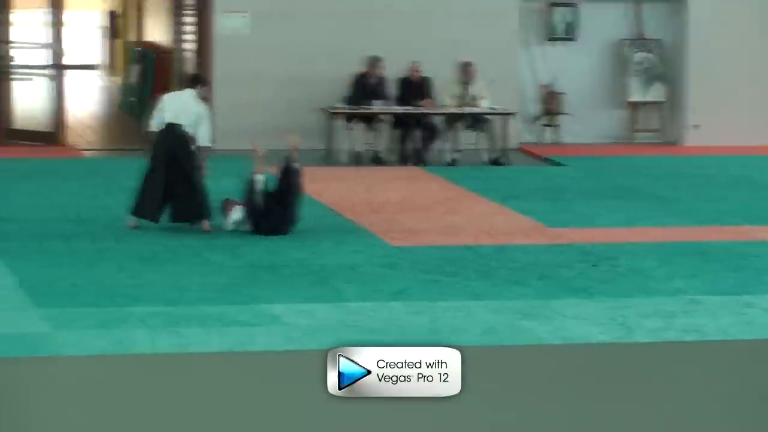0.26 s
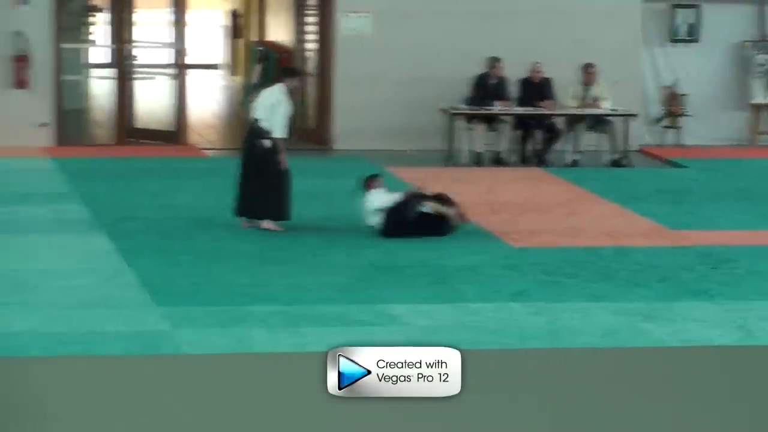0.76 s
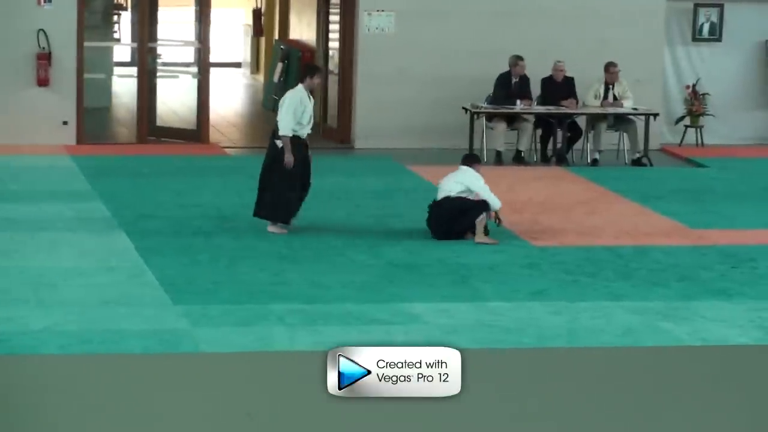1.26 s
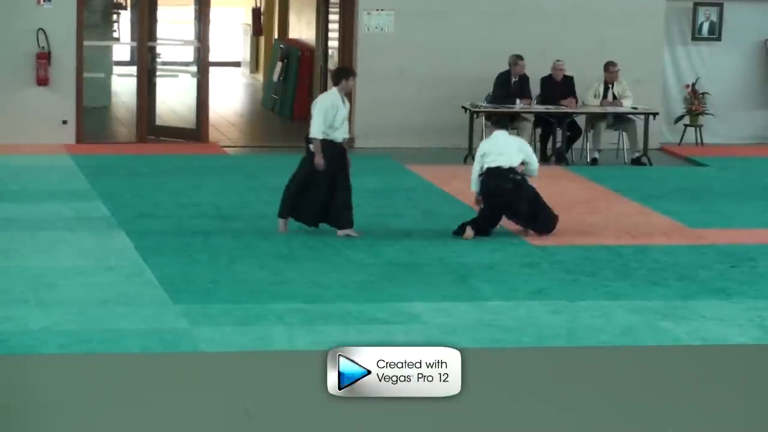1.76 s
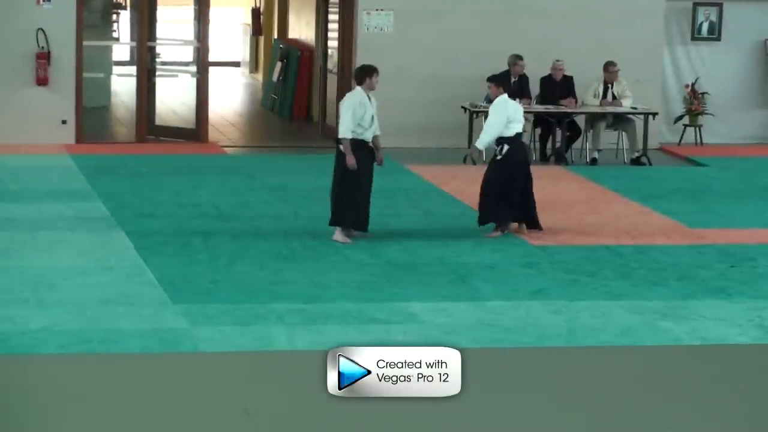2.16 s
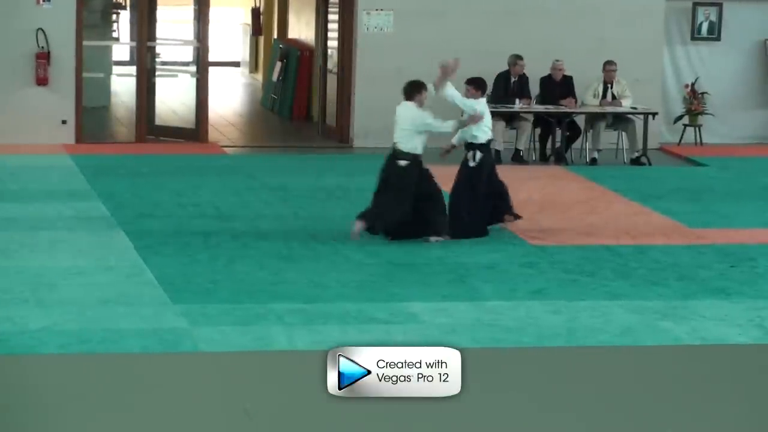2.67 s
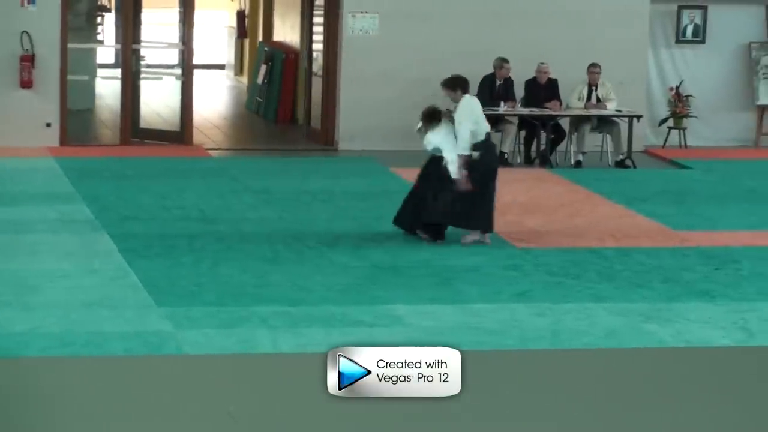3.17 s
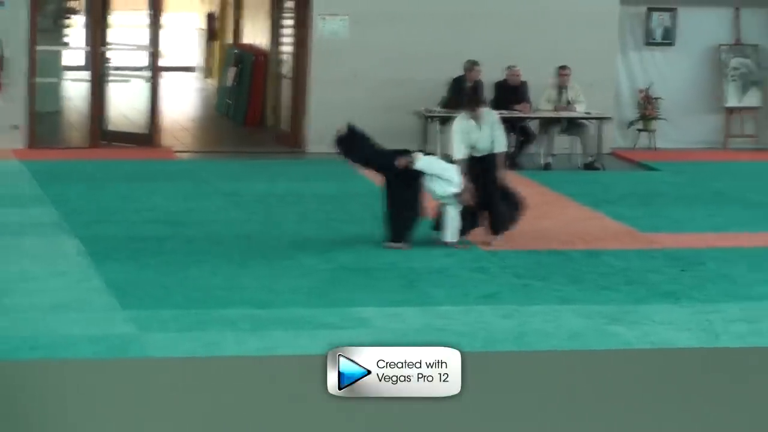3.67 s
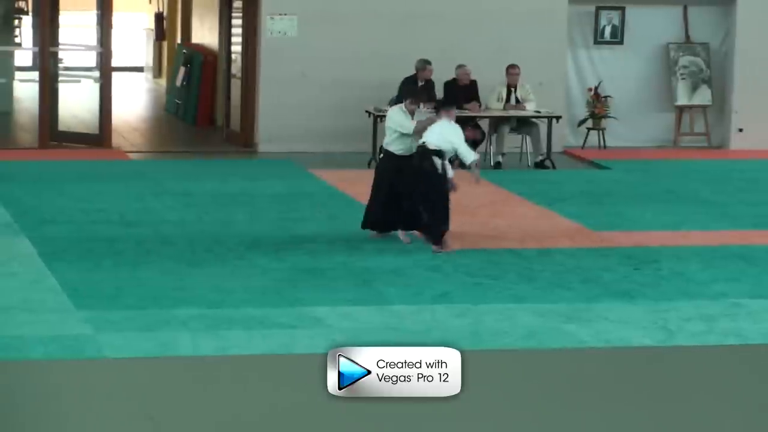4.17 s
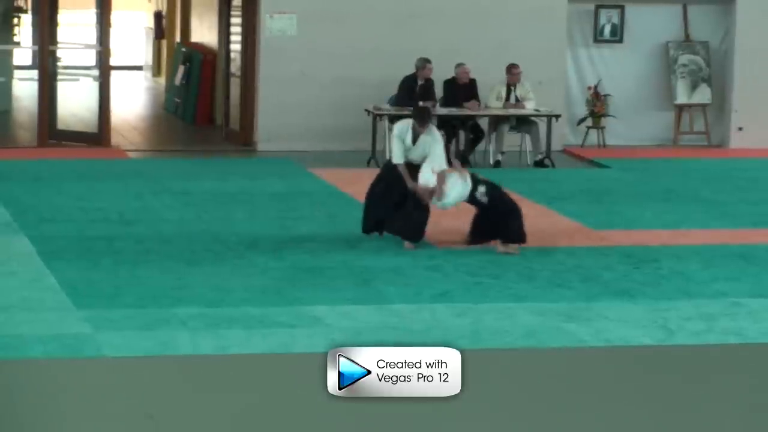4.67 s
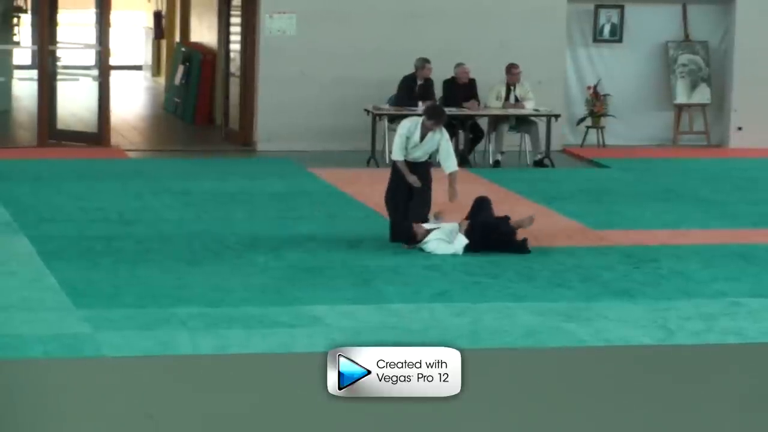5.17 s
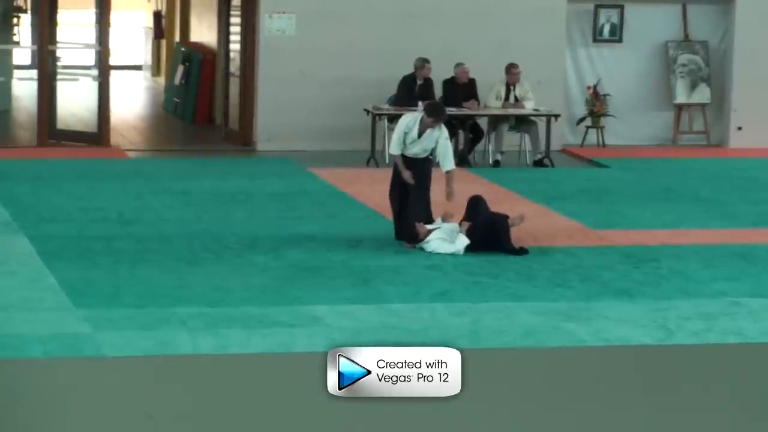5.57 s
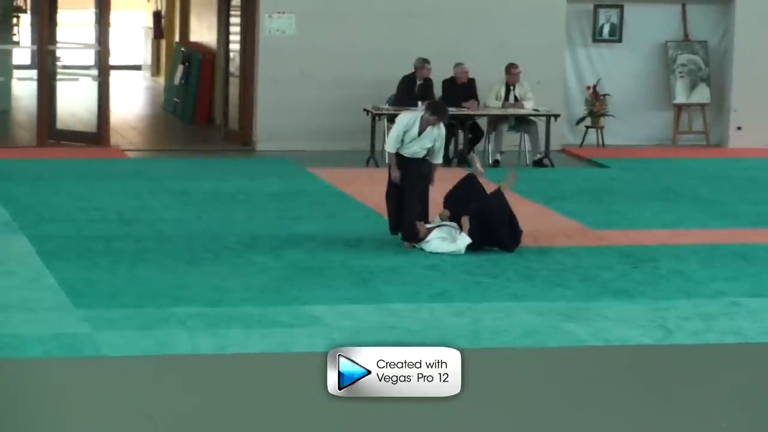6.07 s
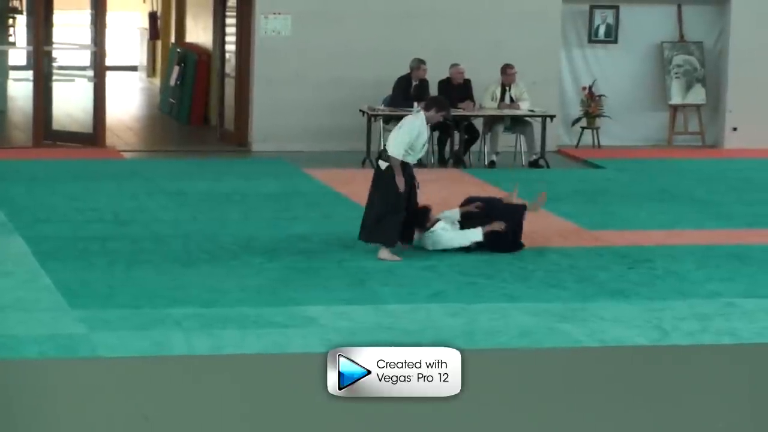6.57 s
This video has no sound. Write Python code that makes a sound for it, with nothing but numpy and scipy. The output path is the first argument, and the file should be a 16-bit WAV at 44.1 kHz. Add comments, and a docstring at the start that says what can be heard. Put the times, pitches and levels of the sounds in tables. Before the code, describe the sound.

Two people practise throws on padded mats in a large echoing hall. Dull thuds and two faint clicks come first, then a quick volley of slaps with a low boom as a body hits the mat. Bare feet thud, slide and squeak faintly before a second, louder landing. A few soft swishes follow. The microphone hears it from some distance, over a low rumble of air.

```python
"""Practising throws in a sports hall

Two people train on padded mats. Twice a body lands flat: arm, back and legs slap the cover,
thump the pads and make the floor boom. Two light taps come early on; around the falls, bare
feet step, slide and squeak. The large hall rings on over a low rumble of air."""
import sys
import numpy as np
from scipy import signal
from scipy.fft import rfft, irfft, next_fast_len
from scipy.io import wavfile

SR = 44100
rng = np.random.default_rng(int(sys.argv[2]) if len(sys.argv) > 2 else 0)


def generate_wav(sig):
    """Save sig (samples, or channels by samples) to the path in sys.argv[1] as 16-bit PCM at SR."""
    pcm = np.round(np.clip(np.atleast_2d(sig).T, -1, 1) * 32767).astype(np.int16)
    wavfile.write(sys.argv[1], SR, pcm)


N = 301203


def amp(db):
    """Turn decibels into a number to multiply a sound by."""
    return 10 ** (np.asarray(db) / 20)


def unit(x):
    """Scale a sound to an average (rms) level of 1."""
    return x / np.sqrt(np.mean(x ** 2) + 1e-20)


def unit_hit(x):
    """Give a short sound the same energy as 10 ms at level 1."""
    return x * np.sqrt(SR / 100 / (np.sum(x ** 2) + 1e-20))


def fade(t, t60):
    """A fade that drops by 60 dB in t60 seconds, the fade time."""
    return np.exp(-np.log(1000) * t / t60)


def along(points, hz):
    """Read between the rows of a (Hz, value) table, giving each octave equal room."""
    freqs, values = np.transpose(points)
    return np.interp(np.log(hz + 1), np.log(freqs), values)


def filtered(x, response):
    """Multiply each frequency in a sound by response(hz)."""
    n = x.shape[-1]
    size = next_fast_len(n + 8192)
    return irfft(rfft(x, size) * response(np.fft.rfftfreq(size, 1 / SR)), size)[..., :n]


def coloured(x, spectrum, size=4096):
    """Shape the tone with a (Hz, dB) table, letting nothing sound ahead of the hit."""
    cepstrum = irfft(np.log(amp(along(spectrum, np.fft.rfftfreq(size, 1 / SR)))))
    cepstrum[1:size // 2] *= 2
    cepstrum[size // 2 + 1:] = 0
    return signal.fftconvolve(x, irfft(np.exp(rfft(cepstrum))))[:len(x)]


def add(track, start_s, sound):
    """Mix a sound into the track at the given time."""
    start = max(0, round(start_s * SR))
    part = track[:, start:start + sound.shape[-1]]
    part += sound[..., :part.shape[-1]]


def air():
    """The air in the room makes a steady noise, with more rumble on the right."""
    # The tone of the air on each side. Each row: frequency in Hz, relative level in dB.
    left_tone = [(8, 1), (22, 1), (100, -3), (900, -0.5), (2000, -6), (4000, -12), (8000, -17.5),
                 (11000, -20.5), (12500, -43), (15500, -34)]
    right_tone = [(8, -26), (24, 1.5), (65, 0.5), (130, -6.5), (220, -10.5), (450, -18), (1000, -21),
                  (2000, -25), (3200, -30), (7500, -33), (11000, -40.5), (14500, -40.5), (15500, -57)]
    left, right = rng.standard_normal((2, N))
    left = amp(-51.5) * unit(filtered(left, lambda hz: amp(along(left_tone, hz))))
    right = amp(-43.5) * unit(filtered(right, lambda hz: amp(along(right_tone, hz))))
    return np.array([left, right])


def hall(x, echo_db, gap_s=0.00067, build_s=0.002):
    """The direct sound comes first; a wash of echoes builds up, then dies fastest in the treble."""
    # How long the hall rings. Each row: frequency in Hz, fade time in seconds.
    fade_times = [(60, 1.12), (120, 1.75), (300, 1.2), (700, 1.5), (2000, 1.67), (4000, 1.51), (7500, 0.86),
                  (11000, 0.49), (15000, 0.41)]
    # Echo strength. Each row: frequency in Hz, dB above the direct sound before echo_db is added.
    echo_levels = [(60, 1.5), (130, -1.5), (300, -3), (1000, 1.5), (4000, 1), (12000, 5.5)]
    # How alike the left and right echoes are. Each row: frequency in Hz, likeness from 0 to 1.
    likeness = [(60, 0.31), (300, 0.85), (1000, 0.81), (3000, 0.63), (8000, 0.53), (15000, .2)]
    hz, t, noise = signal.stft(rng.standard_normal((2, 2 * SR)), SR, nperseg=512)
    t60 = along(fade_times, hz)[:, None]
    even_energy = np.sqrt(2 * np.log(1000) / (t60 * SR))  # a longer ring gains no energy
    tail = noise * amp(along(echo_levels, hz)[:, None] + echo_db) * even_energy * fade(t, t60)
    spread = np.arccos(np.clip(along(likeness, hz), 0, 1))[:, None] / 2
    mid, side = signal.istft(tail * [np.cos(spread), np.sin(spread)], SR, nperseg=512)[1]
    since_gap = np.maximum(np.arange(len(mid)) / SR - gap_s, 0)
    response = np.array([mid + side, mid - side]) * (1 - np.exp(-since_gap / build_s))
    response[:, 0] += 1  # the direct sound
    return signal.fftconvolve(x[None], response, axes=1)


def standing_waves(x):
    """A boom stirs two close, low notes of the hall, which throb against each other as they fade."""
    # The hall's own notes. Each row: pitch in Hz, fade time in seconds, strength in dB.
    notes = [(76.5, 1.5, -10), (87, 1.5, -9)]
    t = np.arange(2 * SR) / SR
    response = sum(amp(db) * 4 * np.log(1000) / (t60 * SR) * fade(t, t60) * np.cos(2 * np.pi * hz * t)
                   for hz, t60, db in notes)
    return signal.fftconvolve(x, response)[:N]


def crack(t, t60, spectrum):
    """Air squeezed from between two surfaces makes a burst of noise that dies at once."""
    decay = fade(t, t60)
    phases = np.angle(rfft(rng.standard_normal(len(t)) * decay))
    even_noise = irfft(np.exp(1j * phases), len(t))  # equally strong at every frequency
    return unit_hit(coloured(even_noise * decay ** (1 / 4), spectrum))


def ring(t, notes, scatter=0.019, vary_db=6.5):
    """A struck thing rings with its own notes, different at every spot; wider notes die sooner."""
    out = np.zeros(len(t))
    for k, (hz, width_hz, db) in enumerate(notes):
        pitch_luck, level_luck = rng.standard_normal(2)
        strength = (-1) ** k * amp(db + vary_db * level_luck) * width_hz
        tone = np.sin(2 * np.pi * hz * np.exp(scatter * pitch_luck) * t)
        out += strength * np.exp(-np.pi * width_hz * t) * tone
    return unit_hit(out)


def taps():
    """Small, hard clicks with a short hollow ring come from across the hall."""
    # The taps. Each row: start in seconds, level in dB.
    hits = [(0.6009, -45.5), (0.653, -53.5)]
    # The tone of a click. Each row: frequency in Hz, relative level in dB.
    click_tone = [(300, -25), (800, -3), (1050, -2), (1250, 4), (1550, -6), (2200, -3), (4000, -9),
                  (5200, -26), (15000, -50)]
    out, t = np.zeros((2, N)), np.arange(SR // 10) / SR
    for start_s, db in hits:
        click = crack(t, t60=0.033, spectrum=click_tone)
        hollow = amp(-11) * ring(t, [(1250, 42, 0)])  # one note near 1250 Hz, 42 Hz wide
        add(out, start_s, hall(amp(db) * (click + hollow), echo_db=0.5))
    return out


def squeaks(width_hz=194, sag_octaves_per_s=0.8):
    """A sole sticks and slips on the vinyl: a rough whistle that sags as the foot slows."""
    # The squeaks. Each row: loudest moment in seconds, level in dB, half length in seconds, pitch in Hz.
    slips = [(2.574, -55.5, 0.056, 3317), (3.417, -58, .028, 5060)]
    out, t = np.zeros((1, N)), np.arange(SR) / SR - .5
    for peak_s, db, half_s, hz in slips:
        flutter = filtered(rng.standard_normal(SR), lambda f: 1 / (1 + (f / width_hz) ** 2))
        whistle = np.sin(2 * np.pi * np.cumsum(hz * 2 ** (-sag_octaves_per_s * t)) / SR)
        swell = np.exp(-(t / half_s) ** 2 / 2)
        add(out, peak_s - .5, amp(db) * unit(flutter * whistle) * swell)
    return hall(out[0], echo_db=-3.0)[:, :N]


def slides(width_octaves=0.88, grain_db=3, grain_hz=140, dull_hz=11500):
    """Soles and cloth rub the cover: a hiss that swells and fades, grainy from the weave."""
    # The sweeps. Each row: loudest moment in seconds, level in dB, half length in seconds.
    sweeps = [(0.718, -62, 0.077), (0.992, -68, 0.1), (1.417, -62, 0.046), (1.593, -65, 0.08),
              (2.603, -56.5, 0.071), (3.041, -65.5, 0.043), (3.397, -57, 0.033), (3.505, -55, .081),
              (3.649, -60, 0.091), (4.114, -57, 0.016), (4.388, -58, 0.1), (6.379, -60.5, .075),
              (6.486, -54, 0.036), (6.636, -66, 0.09)]
    out, t = np.zeros((1, N)), np.arange(SR) / SR
    for peak_s, db, half_s in sweeps:
        centre_hz = 6700 * (0.042 / half_s) ** 0.28  # a quicker sweep is brighter
        band = lambda f: 1 / (1 + (np.log2((f + 1) / centre_hz) / width_octaves) ** 2 / 2) ** 2
        hiss = filtered(rng.standard_normal(SR), lambda f: band(f) / np.sqrt(1 + (f / dull_hz) ** 10))
        grain = amp(grain_db * np.interp(t * grain_hz, np.arange(SR), rng.standard_normal(SR)))
        swell = np.exp(-((t - .5) / half_s) ** 2 / 2)
        add(out, peak_s - .5, amp(db) * unit(hiss * grain) * swell)
    return hall(out[0], echo_db=-4.5)[:, :N]


def mat_hit(slap_db, pad_db, floor_db, pitch, slap_t60, softness, tilt_db_per_octave,
            pocket_hz, pocket_db, pocket_octaves):
    """Skin slaps the cover over a pocket of trapped air, the pad thumps and the floor gives way."""
    # The tone of skin on the cover. Each row: frequency in Hz, relative level in dB.
    skin_tone = [(150, -24), (500, -2), (720, 1.5), (900, 0.5), (1130, 4.5), (1450, 1.5), (2000, 2.5),
                 (2600, -2), (3300, 1.5), (5000, -1), (7200, -3.5), (11000, -15), (15500, -38)]
    # The notes of the pads and the floor. Each row: pitch in Hz, width in Hz, relative level in dB.
    pad_notes = [(160.5, 23, -10.5), (290.4, 49, -0.5), (388, 77, 2), (558, 630, -14)]
    floor_notes = [(55, 21, -15), (70.4, 34, -4.5), (99.8, 11.7, -1.5), (151, 64, -6.5)]
    t = np.arange(SR // 4) / SR
    press = 1 - np.exp(-t / (softness * slap_t60))  # a broad, slow contact starts gently
    hz = np.geomspace(100, SR / 2, 200)
    pocket = pocket_db * np.exp(-(np.log2(hz / pocket_hz) / pocket_octaves) ** 2 / 2)
    tone_db = along(skin_tone, hz) + tilt_db_per_octave * np.log2(hz / 2500) + pocket
    slap = unit_hit(press * crack(t, slap_t60, np.transpose([hz, tone_db])))
    pad = unit_hit(press * ring(t * pitch, pad_notes, scatter=0.036))
    floor = unit_hit(press * ring(t, floor_notes))
    return amp(slap_db) * slap - amp(pad_db) * pad - amp(floor_db) * floor


def steps():
    """Feet and a rolling body come down softly: dull thuds, heard mostly through the hall's echo."""
    # The thuds. Each row: start in seconds, pad thump in dB, floor boom in dB, pad pitch as a ratio.
    thuds = [(.001, -36.5, -26.5, 1.06), (0.057, -43.5, -33.5, 0.93), (0.143, -49, -35.5, 0.76),
             (0.3077, -44, -53.5, 1.08), (.564, -50, -48, 0.66), (1.395, -51, -46, 1.18),
             (1.63, -55, -58, 1.55), (2.164, -28.5, -17, 0.62), (2.245, -26, -37, 1.01),
             (2.385, -44, -26, 1.13), (3.11, -51.5, -52.5, 1.006), (4.121, -39, -38, .85),
             (4.15, -35.5, -41, 0.43), (4.465, -49.5, -39, 0.84), (4.692, -58, -63, 0.77),
             (5.125, -31, -16, 0.95), (5.29, -36.5, -24.5, 1.01)]
    out = np.zeros((2, N))
    for start_s, pad_db, floor_db, pitch in thuds:
        # Harder contacts scuff more, and so do small, high-pitched ones.
        scuff_db = -46.5 + 0.51 * (pad_db + 41) + 1.5 * np.log2(pitch)
        thud = mat_hit(scuff_db, pad_db, floor_db, pitch,
                       slap_t60=0.1, softness=0.023, tilt_db_per_octave=-4.0,
                       pocket_hz=636, pocket_db=4, pocket_octaves=0.35)
        add(out, start_s, hall(thud, echo_db=3.5))
    return out


def falls(boom_above_slap_db=5.5, sink_delay_s=0.012):
    """Limbs land in a quick volley: the skin slaps first, then the weight sinks into the mat."""
    # Limbs landing flat. Each row: start in seconds, slap in dB, pad thump in dB, weight behind it
    # in dB, slap fade time in seconds, pad pitch as a ratio, pitch of the trapped air in Hz.
    limbs = [(2.0208, -24.5, -19.5, -17.5, 0.013, 1.03, 2200), (2.0592, -28, -19, -17, 0.017, 1.23, 4400),
             (2.091, -30, -20.5, -16, 0.028, 1.11, 4300), (2.1158, -36.5, -31, -24, 0.024, 1.37, 2100),
             (2.271, -41.5, -23.5, -29, 0.045, 1.06, 3560), (4.9424, -20, -9, -13.5, 0.023, 0.995, 2210),
             (4.9701, -26.5, -15.5, -21.5, 0.028, 0.92, 3350),
             (4.9905, -27.5, -18.5, -13, 0.043, 1.033, 3470), (5.0718, -30.5, -18, -36, 0.023, 0.97, 3100),
             (5.0949, -38.5, -22.5, -24.5, 0.012, 1.16, 2200)]
    out = np.zeros((2, N))
    for start_s, slap_db, pad_db, weight_db, t60, pitch, pocket_hz in limbs:
        slap = mat_hit(slap_db, pad_db, slap_db + boom_above_slap_db, pitch,
                       slap_t60=t60, softness=0.037, tilt_db_per_octave=-1.1,
                       pocket_hz=pocket_hz, pocket_db=5, pocket_octaves=0.28)
        sink = mat_hit(slap_db - 10.5, weight_db - 0.5, weight_db, pitch,
                       slap_t60=0.047, softness=0.035, tilt_db_per_octave=-0.4,
                       pocket_hz=3000, pocket_db=4, pocket_octaves=0.32)
        add(out, start_s, hall(slap, echo_db=-3.04))
        add(out, start_s + sink_delay_s, hall(sink, echo_db=-2.0))
    return out + standing_waves(out.mean(axis=0))


def microphones(hz):
    """Two close microphones hear the mat a little louder on the right and earlier on the left."""
    # The balance. Each row: frequency in Hz, left level minus right level in dB.
    balance = [(60, -2.5), (200, -1), (700, -3), (1300, -4.5), (4400, -6.8), (15000, -6)]
    # The left side's head start. Each row: frequency in Hz, lead in radians.
    lead = [(60, 1), (160, 0.08), (450, 0.91), (900, 0.21), (1700, .4), (3700, 0.72), (15000, 0)]
    share = np.array([[.5], [-.5]])
    return amp(share * along(balance, hz)) * np.exp(1j * share * along(lead, hz))


def scene(low_cut_hz=48):
    """Cut the deepest bass from all the practice sounds and lay them over the room noise."""
    action = falls() + steps() + taps() + slides() + squeaks()
    action = signal.sosfilt(signal.butter(3, low_cut_hz, "high", fs=SR, output="sos"), action)
    return filtered(action, microphones) + air()


def record(dry, ceiling=0.79, top_hz=15720):
    """Round off the loudest peaks and cut away the very highest treble."""
    rounded = dry / (1 + np.abs(dry / ceiling) ** 6) ** (1 / 6)
    return filtered(rounded, lambda hz: hz < top_hz)


dry = scene()
out = record(dry)
generate_wav(out)
```